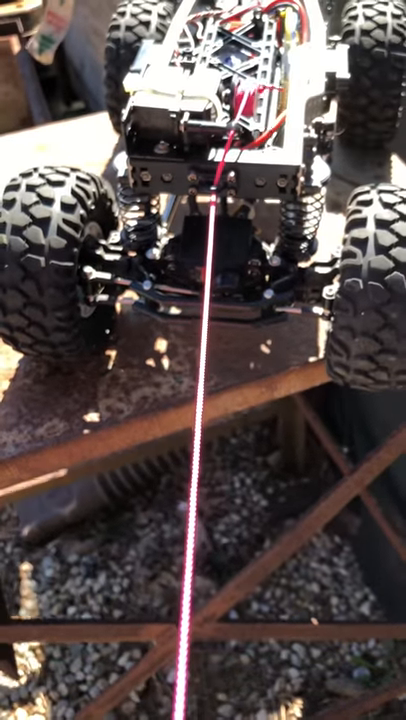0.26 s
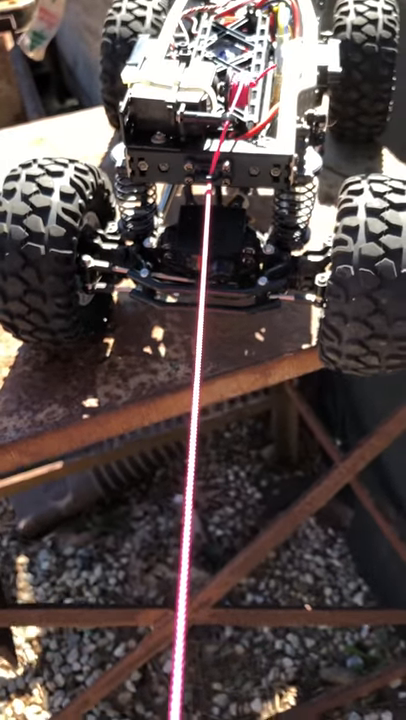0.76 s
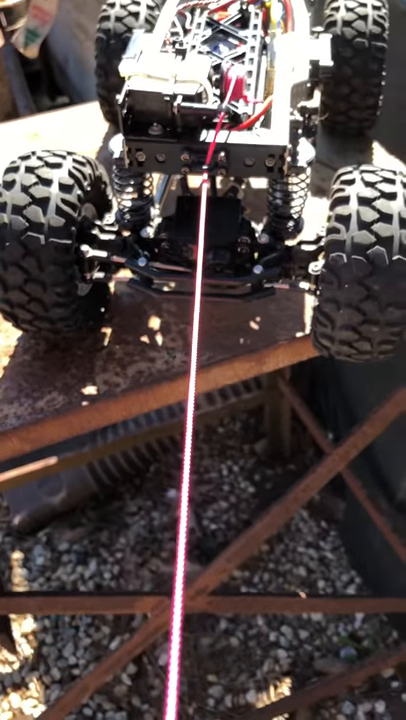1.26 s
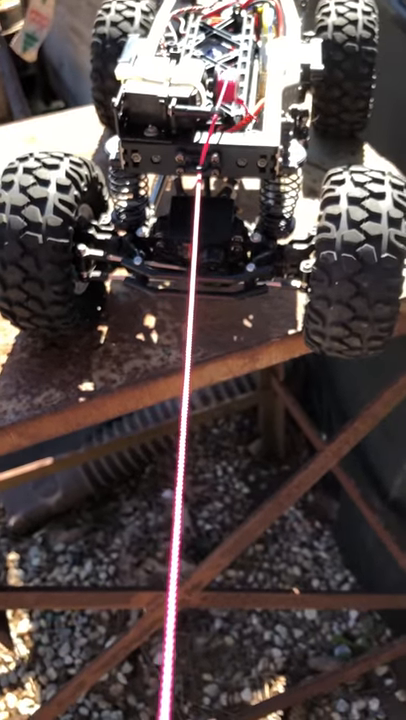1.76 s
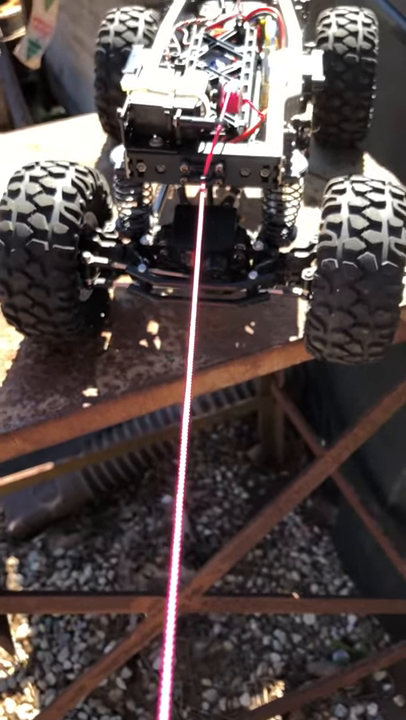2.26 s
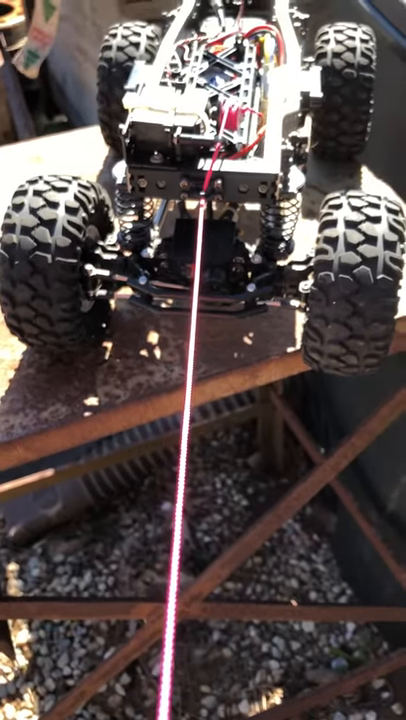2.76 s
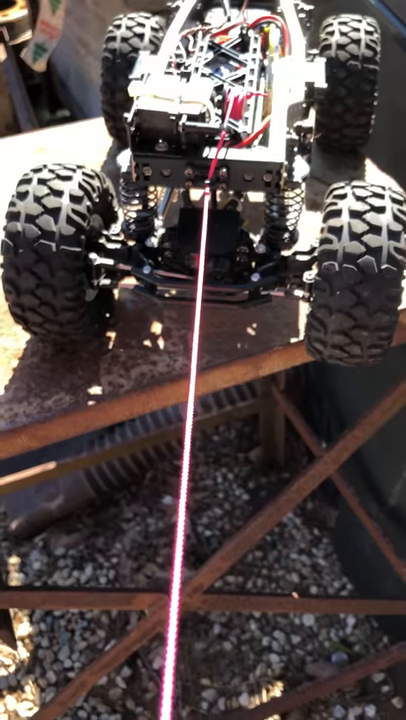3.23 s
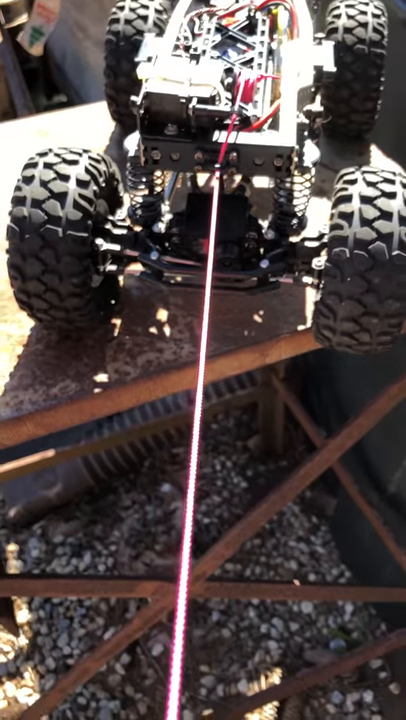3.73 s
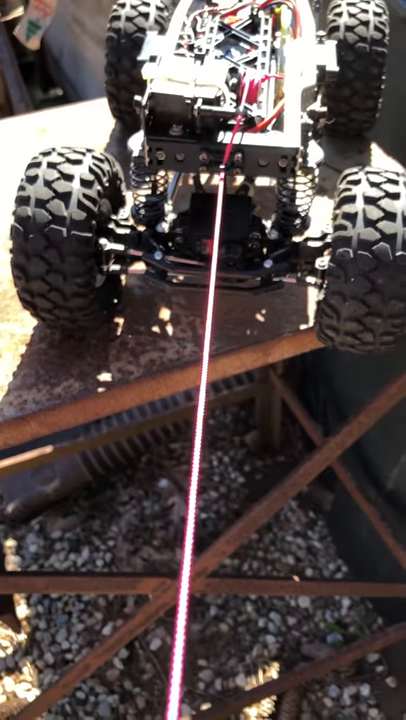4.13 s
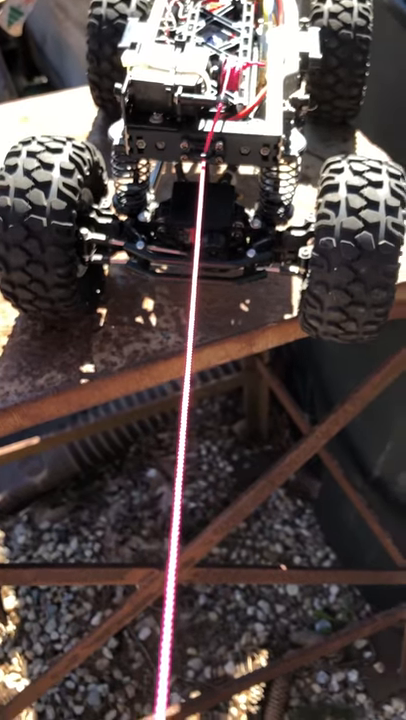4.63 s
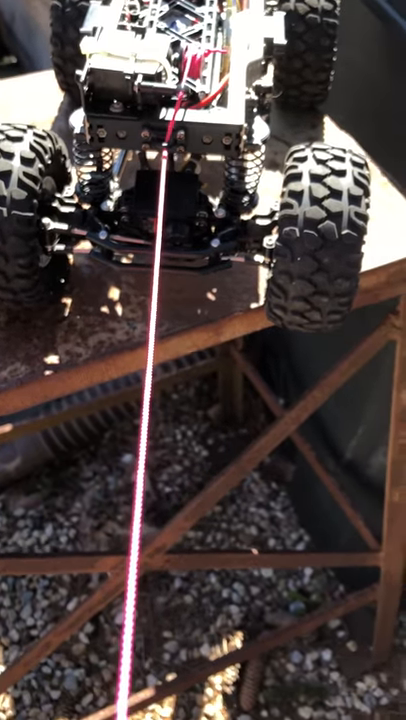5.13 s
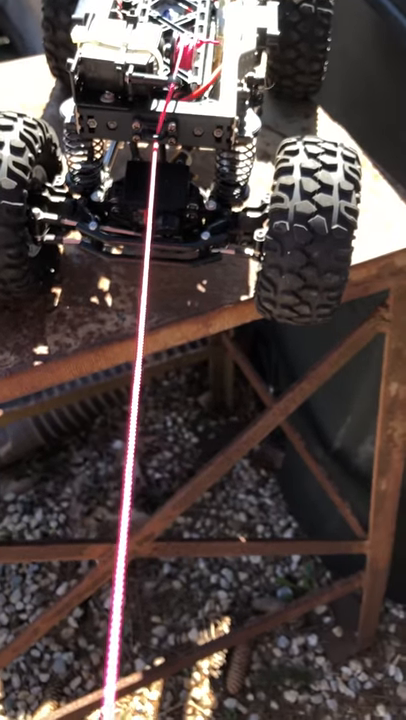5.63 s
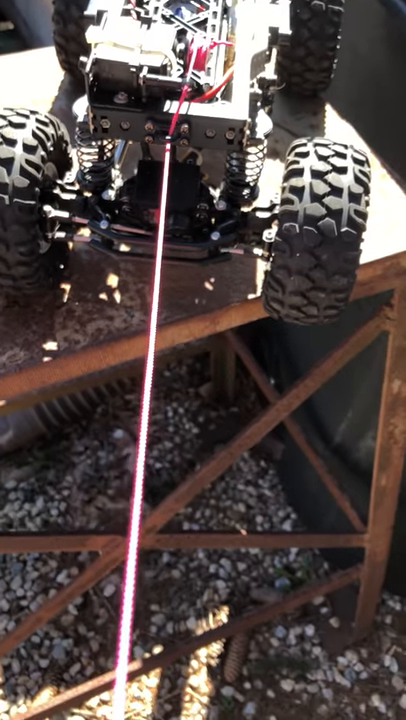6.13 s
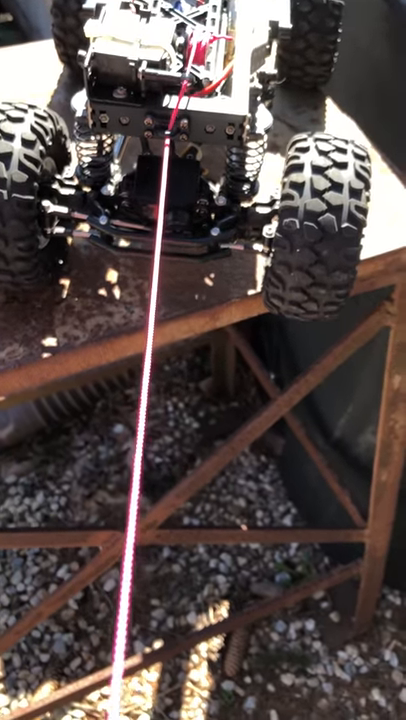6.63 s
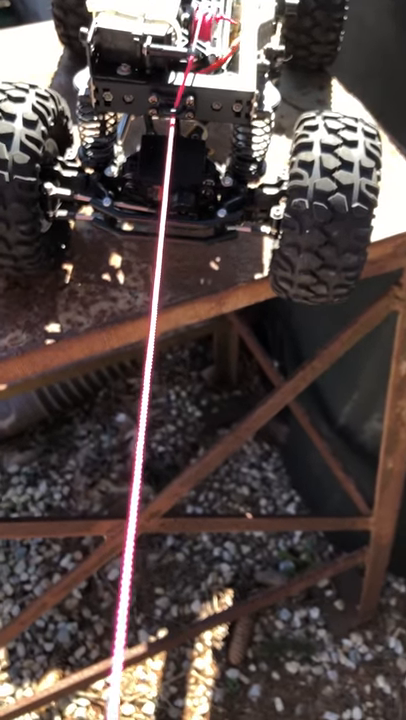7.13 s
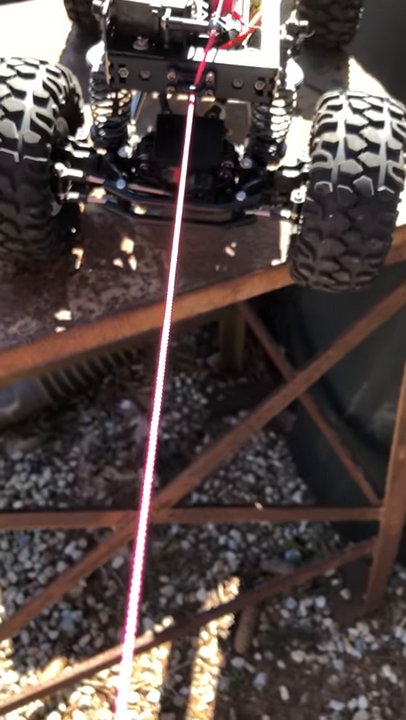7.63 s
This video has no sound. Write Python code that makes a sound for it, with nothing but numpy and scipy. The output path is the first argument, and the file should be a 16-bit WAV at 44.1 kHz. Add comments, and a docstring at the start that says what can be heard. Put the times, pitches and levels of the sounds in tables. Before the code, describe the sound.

A small winch rasps and pings, pulls a model truck knocking onto steel, pauses amid faint birdsong, then whines back to life.

```python
"""First you hear rasping gears, close by and outdoors: a small servo winch is dragging a model truck.
The taut line pings as it slips on the drum, and the truck rumbles and knocks up onto a steel plate.
The winch stops. In the pause the line ticks and creaks, and birds twitter over a distant hum.
At the end the motor spins up again with a whine and reels in the line."""
import sys
import numpy as np
from scipy import signal
from scipy.fft import rfft, irfft
from scipy.io import wavfile
from scipy.ndimage import uniform_filter1d, map_coordinates

SR = 44100
rng = np.random.default_rng(int(sys.argv[2]) if len(sys.argv) > 2 else 0)


def int16_out(signal):
    """Quantize to a 16-bit WAV file."""
    q = np.round(np.clip(np.atleast_2d(signal).T, -1, 1) * 32767)
    wavfile.write(sys.argv[1], SR, q.astype(np.int16))


N = 347508
T = np.arange(N) / SR
HZ = np.fft.rfftfreq(N, 1 / SR)


def amp(db):
    """Turns decibels into a number to multiply by."""
    return 10 ** (np.asarray(db) / 20)


def evened(x):
    """Scales a signal to an average strength (rms) of 1."""
    return x / np.sqrt(np.mean(x ** 2) + 1e-20)


def at_peak(x, db):
    """Scales a sound so that its peak is at db."""
    return amp(db) * x / abs(x).max()


def read(points, hz):
    """Looks up a table between its frequencies, with octaves evenly spaced."""
    f, value = np.transpose(points)
    return np.interp(np.log(hz + 1), np.log(f + 1), value)


def add(mix, s, sound):
    """Mixes a sound in, s seconds from the start."""
    part = mix[max(round(s * SR), 0):][:len(sound)]
    part += sound[:len(part)]


def wander(rate_hz):
    """A smooth random wobble; a higher rate makes it quicker."""
    return evened(irfft(rfft(rng.standard_normal(N)) * np.exp(-(HZ / rate_hz) ** 2), N))


def coloured(x, colour, modes=()):
    """Gives x a colour (its balance of lows and highs) and modes (narrow peaks and dips)."""
    hz = np.fft.rfftfreq(len(x), 1 / SR)
    peaks = sum(db / (1 + (2 * (hz - f) / width) ** 4) for f, width, db in modes)
    return evened(irfft(rfft(x) * amp(read(colour, hz) + peaks), len(x)))


def envelope(start, end, rise_s, fall_db_per_s):
    """Rises from start, holds until end, then dies away."""
    rise = 1 - np.exp(-np.maximum(T - start, 0) / rise_s)
    return rise * amp(-fall_db_per_s * np.maximum(T - end, 0))


# the winch struggles, eases off and stops; later it restarts and the line goes taut
LABOUR_S, EASE_S, STOP_S, RESTART_S, TAUT_S = 1.555, 2.055, 3.08, 7.112, 7.235
FREE_HZ = 1495  # the motor's pitch on a slack line
# motor speed while reeling in (time [s], pitch [Hz])
REEL_SPEED = [(7.24, 1479), (7.412, 1384), (7.562, 1395), (7.588, 1381), (7.76, 1388), (7.778, 1362),
              (7.85, 1363)]


def motor_speed(pull_hz=1400, sag_hz_per_s=130, spin_up_s=.008):
    """Speed as a pitch: the motor slows under load, races on the slack line, then settles."""
    pulling = pull_hz - sag_hz_per_s * np.minimum(T, EASE_S)
    racing = FREE_HZ * (1 - np.exp(-np.maximum(T - RESTART_S, 0) / spin_up_s))
    reeling = np.interp(T, *np.transpose(REEL_SPEED))
    speed = np.select([T < RESTART_S, T < TAUT_S], [pulling, racing], reeling)
    return speed * (1 + .0065 * wander(20))


# slightly lopsided gear wheels (speed [turns per tooth strike], ripple [dB])
WHEELS = [(1 / 61, 1.3), (2 / 61, 0.72), (5 / 56, 0.41)]


def gears(teeth, grit_db=2.5, hiss=.79, wear=.5, flicker_db=1.24):
    """Teeth strike unevenly and slide; lopsided wheels make the force ripple."""
    strikes = np.diff(np.floor(teeth), prepend=0) * amp(grit_db * np.clip(rng.standard_normal(N), -2, 2))
    # the small driving gear scrapes over the same worn spots on every turn
    surface = rng.standard_normal(330)
    scrape = map_coordinates(surface, [teeth / 11 % 1 * len(surface)], order=3, mode="grid-wrap")
    clatter = evened(strikes * rng.standard_normal(N))
    rasp = .44 * clatter + wear * scrape + hiss * rng.standard_normal(N)
    ripple = sum(db * np.sin(2 * np.pi * (ratio * teeth + rng.random())) for ratio, db in WHEELS)
    return rasp * amp(ripple + flicker_db * wander(140))


def labouring(throb_hz=11.4, throb_db=.9, sag_db=-15, catch_s=1.577, turn_s=.0631):
    """The load throbs; close to stalling, the gears go quieter and catch twice a turn."""
    def catch(first_s, width_s, db):
        offset = (T - first_s + turn_s / 2) % turn_s - turn_s / 2
        return db * np.exp(-(offset / width_s) ** 4)
    surges = sag_db + catch(catch_s, width_s=.0125, db=13.3) + catch(catch_s + .026, .008, db=10.5)
    throb = throb_db * np.sin(2 * np.pi * (throb_hz * T + rng.random()))
    return amp(uniform_filter1d(np.where(T < LABOUR_S, throb, surges), size=130))


# the gear case's colour when pulling, coasting, racing and reeling (frequency [Hz], level [dB])
PULL_CASE = [(240, -45), (400, -10.5), (763, -19), (1570, -11.5), (1780, -15.5), (1980, -12.5),
             (2210, -15.5), (3500, -12), (6180, -10), (9080, -1.5), (15800, -4.5)]
COAST_CASE = [(700, -22), (1200, -12), (2000, -14), (3400, -12), (5000, -11.5), (6300, -14.5), (7300, -7.7),
              (8700, -12.5), (10500, -14.5), (12000, -14), (13500, -9), (15800, -5)]
SPIN_CASE = [(350, -63), (600, -33), (757, -10), (880, -19.5), (2630, -10), (2930, -8), (4190, -13),
             (5070, -5), (13800, -2), (15800, -2)]
REEL_CASE = [(500, -40), (900, -19), (1400, -19), (2300, -22.5), (2700, -15.5), (3500, -7), (5000, -6.5),
             (7100, -4), (9200, 0.5), (12000, -4), (15800, -4)]
# its peaks and dips, plus extra ones when racing and reeling (frequency [Hz], width [Hz], boost [dB])
CASE_MODES = [(1987, 150, 6.5), (2430, 90, 1.5), (2645, 280, 5.5), (3020, 210, 5.5), (3465, 216, 8.5),
              (3750, 190, -3), (3980, 130, 2.5), (4280, 200, -1), (4950, 680, 5), (5590, 230, 3.5),
              (6270, 420, -1.5), (7130, 370, 7), (7680, 300, -1.5), (8100, 250, -8), (9040, 410, 5.5),
              (10090, 320, -6), (10600, 700, 2.5), (11440, 510, -7), (12000, 380, 1.5), (13000, 1000, 1.5),
              (14600, 970, -6)]
SPIN_MODES = [(1830, 100, 4), (2210, 90, 6), (3000, 53, 12.5), (3480, 110, 5), (4180, 180, -5),
              (5170, 80, -2), (6700, 120, 7), (10050, 200, -6), (10400, 300, 6), (13800, 830, 6)]
REEL_MODES = [(2300, 250, -2), (2750, 90, -2), (3080, 270, -1.5), (3530, 180, -0.5), (3850, 160, -2),
              (4060, 98, 2), (4300, 230, -8), (5400, 150, 1), (6170, 730, -5), (7250, 160, 1),
              (7750, 300, -1), (8120, 140, 11), (8550, 200, -5), (9700, 270, -10), (10460, 280, 2)]


def winch(pull_db=-39.7, coast_db=-59.5, spin_db=-31.7, reel_db=-42.7, rise_s=.003, cut_db_per_s=1800):
    """The gears rasp inside their case; after the restart the motor's whine joins in."""
    speed = motor_speed()
    teeth = np.cumsum(speed) / SR  # counts the tooth strikes so far
    drive = gears(teeth)
    pull = envelope(0, EASE_S, rise_s, cut_db_per_s) * labouring()
    # a softer whirr is left when the drive lets go
    unloading = amp(9.3 * np.exp(-(np.maximum(T - EASE_S, 0) / .4) ** 2))
    coast = envelope(LABOUR_S, STOP_S, rise_s, fall_db_per_s=95) * unloading
    spin = envelope(RESTART_S, TAUT_S, rise_s=.022, fall_db_per_s=cut_db_per_s)
    reel = envelope(TAUT_S, T[-1], rise_s, cut_db_per_s)
    rasp = amp(pull_db) * pull * coloured(drive, PULL_CASE, CASE_MODES)
    rasp += amp(coast_db) * coast * coloured(drive, COAST_CASE, CASE_MODES)
    rasp += amp(spin_db) * spin * coloured(drive, SPIN_CASE, CASE_MODES + SPIN_MODES)
    rasp += amp(reel_db) * reel * coloured(drive, REEL_CASE, CASE_MODES + REEL_MODES)
    return rasp + whine(speed, teeth, spin, reel)


# the hum's low note (time [s], level [dB])
HUM_LEVEL = [(0, -53), (.95, -58.5), (1.6, -53), (2.6, -61.5), (4.15, -63), (4.45, -50), (5.1, -53),
             (5.65, -63), (6.95, -52.5), (7.4, -58), (7.88, -57)]
# the note an octave above it (time [s], level added to octave_db [dB])
OCTAVE_LEVEL = [(0, -8), (4.2, -6.5), (4.7, 1), (5.5, -7), (6.3, 4), (6.8, -2), (7.88, -8)]


def hum(pitch_hz=148.6, droop_per_s=.0022, octave_db=-68):
    """A distant machine hums on two notes that waver and slowly sink."""
    phase = 2 * np.pi * pitch_hz * np.cumsum(1 - droop_per_s * T + .0035 * wander(4.8)) / SR
    low = amp(np.interp(T, *np.transpose(HUM_LEVEL))) * np.sin(phase)
    octave = amp(octave_db + np.interp(T, *np.transpose(OCTAVE_LEVEL))) * np.sin(2 * phase)
    return np.sqrt(2) * (low + octave)


# the colour of outdoor air (frequency [Hz], level [dB])
AIR_COLOUR = [(15, -55), (25, -29), (60, -4.5), (95, -8), (125, -7), (180, -10), (290, -16), (490, -17.5),
              (790, -23.5), (1930, -39), (7400, -47.5), (11700, -49), (15800, -47.5)]


def air(level_db=-56.5, swell_db=1):
    """A low wash of air that gently swells and fades."""
    return amp(level_db + swell_db * wander(1.33)) * coloured(rng.standard_normal(N), AIR_COLOUR)


# very high electronic tones (pitch [Hz], level [dB])
TONES = [(11763, -89.5), (14702, -93)]


def electronic_tones():
    """Electronics whistle faintly and steadily."""
    return np.sqrt(2) * sum(amp(db) * np.sin(2 * np.pi * hz * T) for hz, db in TONES)


# slips of the line (time [s], ping peak [dB], brightness [dB], snap peak [dB])
PINGS = [(.094, -29.5, -1.5, -57), (.297, -28, -8.5, -55), (.533, -27.5, -3, -48), (.684, -33, -22, -55),
         (1.184, -29, -9, -50), (1.632, -38, -6, -55), (1.78, -29, -2.5, -49), (2.5978, -26, 1, -30),
         (2.8966, -25, 1, -31.5), (3.2159, -36, 1.5, -43), (4.126, -27.5, -2.5, -28.5),
         (4.3112, -26, 6.5, -27.5), (6.878, -33.5, -10, -55), (7.0996, -19, 11, -39)]
# the colour of a ping (frequency [Hz], level [dB])
PING_COLOUR = [(500, -50), (720, -12), (850, 2.5), (1100, -7), (1320, 3), (1700, -8.5), (2050, 0),
               (2450, 2.5), (2850, -4.5), (3400, -12), (4000, -7), (5000, -4), (7000, -20.5), (9000, -37),
               (16000, -25)]


def pings(lag_s=.0035, scatter=.64, ring_s=.06):
    """Each slip snaps and sends a wave along the line; its highs arrive first, making a tiny 'pew'."""
    out, t, hz = np.zeros(N), T[:4096], np.fft.rfftfreq(4096, 1 / SR)
    delay = lag_s * (1000 / np.maximum(hz, 500)) ** 1.5
    glide = np.exp(-2j * np.pi * np.cumsum(delay) * hz[1])
    highs = np.exp(-(np.log2((hz + 1) / 4400) / .67) ** 2)  # harder slips ring more up here
    for s, db, bright_db, snap_db in PINGS:
        echoes = evened(rng.standard_normal(len(t)) * amp(-60 * t / ring_s)) / np.sqrt(len(t))
        spectrum = (1 + scatter * rfft(echoes)) * glide * amp(read(PING_COLOUR, hz) + bright_db * highs)
        ping = np.roll(irfft(spectrum), 64)  # leaves room for the start of the ping
        add(out, s - 48 / SR, at_peak(ping, db))
        add(out, s, snap(snap_db, length_s=.0028))
    return out


# the colour of a snap or tick (frequency [Hz], level [dB])
SNAP_COLOUR = [(600, -32), (2000, -3.5), (3500, -1.5), (5500, -6), (7300, -0.5), (8500, 0), (10500, -1.5),
               (13500, -9), (16000, -9.5)]


def snap(peak_db, length_s, ring_s=.09, ring_db=-17):
    """A dry crackle, then a brief ring of the frame."""
    t = T[:3000]
    shape = np.exp(-(t / length_s) ** 2) + amp(ring_db - 60 * t / ring_s)
    return at_peak(coloured(rng.standard_normal(len(t)), SNAP_COLOUR) * shape, peak_db)


# soft low bumps (time [s], peak [dB], length [s], pitch [times normal])
BUMPS = [(1.308, -41.5, 0.038, 1.02), (1.384, -36, 0.049, 1.02), (1.511, -38.5, 0.092, 0.93),
         (4.795, -33, .016, 1.25), (4.803, -36, .008, 3.1), (5.581, -44.5, 0.034, 1.08),
         (5.809, -45.5, .04, 1.02)]
# their colour at normal pitch (frequency [Hz], level [dB])
BUMP_COLOUR = [(25, -30), (45, 2), (70, 22), (110, 2), (200, -9), (320, -17), (520, -41), (2000, -70)]


def bumps():
    """Dull pushes with no ring, each a short swell of deep noise."""
    out, t = np.zeros(N), T[:SR // 4]
    for s, db, length, pitch in BUMPS:
        push = rng.standard_normal(len(t)) * np.exp(-(2 * (t - t.mean()) / length) ** 2)
        bump = coloured(push, np.multiply(BUMP_COLOUR, [pitch, 1]))
        add(out, s - t.mean(), at_peak(bump, db))
    return out


# lurches of the truck (start [s], end [s], level [dB], fade [dB per s])
LURCHES = [(1.829, 2.06, -33, 55), (2.222, 2.36, -33, 125)]
# the steel plate's colour (frequency [Hz], level [dB])
PLATE_COLOUR = [(21, -38), (35, -20), (65, 9), (298, -7.5), (434, -10.5), (672, -11), (979, -13),
                (1170, -25), (1270, -12.5), (1460, -24.5), (4000, -30.5), (5200, -42), (8800, -120)]
# its peaks and dips (frequency [Hz], width [Hz], boost [dB])
PLATE_MODES = [(62.3, 9.4, 7), (100, 15, -6), (122, 7.6, 2), (286, 33, 0), (389, 31, 8), (443, 13, 9),
               (538, 9.1, 8), (664, 98, -3), (766, 45, 4.5), (983, 83, 4), (1242, 33, 6.5), (1590, 20, 2.5),
               (1705, 20, 2)]


def plate_rumble(rise_s=.008, lumps_db=2, linger_db=-26):
    """The tyres lurch over the edge and shake the plate; the frame rings on faintly."""
    rumble = coloured(rng.standard_normal(N) * amp(lumps_db * wander(66)), PLATE_COLOUR, PLATE_MODES)
    shake = np.zeros(N)
    for start, end, db, fade in LURCHES:
        shake += amp(db) * envelope(start, end, rise_s, fade)
        shake += amp(db + linger_db) * envelope(start, end, rise_s, fall_db_per_s=9)
    return shake * rumble


# blows on the plate (time [s], peak before gain_db [dB], treble before bright_db [dB])
KNOCKS = [(1.834, -26, -20), (1.882, -24, -20), (1.908, -17, -15), (1.941, -20.5, -24), (1.984, -24.5, -15),
          (2.003, -26.5, -12), (2.03, -24.5, -14), (2.046, -19, -15), (2.225, -21.5, -16),
          (2.265, -17, -11.5), (2.307, -21, -10.5), (2.342, -25.5, -17), (2.474, -38, -27)]
# the colour of a blow (frequency [Hz], level [dB])
KNOCK_COLOUR = [(40, -25), (100, 0), (400, -3.5), (900, -7.5), (1500, -9.5), (2500, -15), (6000, -13),
                (10000, -22), (16000, -22)]
# how long it rings (frequency [Hz], time to fade by 60 dB [s])
KNOCK_RING = [(70, 0.33), (500, .17), (1500, 0.11), (4000, 0.06), (12000, 0.037)]


def knocks(gain_db=1, bright_db=8):
    """The truck knocks on the steel plate; the highs die away first."""
    out = np.zeros(N)
    for s, db, treble_db in KNOCKS:
        noise = coloured(rng.standard_normal(SR // 3), KNOCK_COLOUR, PLATE_MODES)
        hz, t, bands = signal.stft(noise, SR, nperseg=256)
        tilt_db = (treble_db + bright_db) / (1 + (3500 / (hz + 1)) ** 4)
        fade_db = 60 * t / read(KNOCK_RING, hz)[:, None]
        blow = signal.istft(bands * amp(tilt_db[:, None] - fade_db), SR, nperseg=256)[1]
        add(out, s, at_peak(blow, db + gain_db))
    return out


# small dry ticks (time [s], peak [dB])
TICKS = [(2.1258, -34), (2.3281, -32), (2.4284, -33.5), (2.5331, -38), (2.6594, -36.5), (2.802, -38.5),
         (2.9396, -37), (3.0759, -36.5), (3.209, -40.5), (3.24, -41), (3.464, -41), (3.5285, -48),
         (3.689, -43.5), (3.719, -43.5), (3.865, -41), (3.9443, -47), (3.9758, -43), (4.0896, -41),
         (4.1533, -44), (4.2492, -43), (4.2802, -43)]


def ticks(faint_count=6, faint_db=-54, faint_span_s=(3.5, 4.3)):
    """The taut line and the gears tick as they settle, with a few fainter ticks at random."""
    out = np.zeros(N)
    slots = (np.arange(faint_count) + rng.random(faint_count)) / faint_count
    times = np.interp(slots, [0, 1], faint_span_s)
    levels = faint_db + 2 * rng.standard_normal(faint_count)
    for s, db in TICKS + list(zip(times, levels)):
        add(out, s, snap(db, length_s=.0016))
    return out


def sing(mix, start, db, glide, roughness):
    """Adds one bird note: a trembling, sliding whistle, never twice quite the same."""
    s, hz = np.transpose(glide)
    t = np.arange(s.min(), s.max(), 1 / SR)
    tremble = evened(uniform_filter1d(rng.standard_normal(len(t)), size=24))
    pitch = uniform_filter1d(np.interp(t, s, hz), size=200)
    pitch *= 1 + .0165 * rng.standard_normal() + roughness * tremble
    whistle = np.sin(2 * np.pi * np.cumsum(pitch) / SR) * signal.windows.tukey(len(t), .7)
    add(mix, start + s[0], amp(db + 1.5 * rng.standard_normal()) * whistle)


# each time the phrase is sung (time [s], base level [dB])
PHRASES = [(2.548, -55), (3.129, -55.5), (4.022, -56.5), (4.944, -54), (5.718, -52.5), (6.988, -55)]
# its notes (added level [dB], list of (time in the phrase [s], pitch [Hz]))
PHRASE_NOTES = [(-6, [(-.04, 4000), (-.03, 4600), (-.012, 3900)]), (-15, [(-.02, 8700), (-.012, 7400),
                (0, 6000)]), (-1, [(-.003, 4600), (.009, 5430), (.022, 5330), (.032, 4900)]),
                (-5, [(.03, 5000), (.042, 4150), (.055, 3550), (.08, 3100)]), (1, [(.016, 4100),
                (.028, 4550), (.04, 4650), (.048, 3900)]), (-3, [(.052, 5100), (.066, 3600)]),
                (-7.5, [(.09, 3000), (.118, 4000), (.135, 3000)])]


def bird_phrases(gain_db=-.2):
    """A bird repeats one short phrase."""
    out = np.zeros(N)
    for s, db in PHRASES:
        for note_db, glide in PHRASE_NOTES:
            sing(out, s, db + note_db + gain_db, glide, roughness=.026)
    return out


TRILL_START_S, TRILL_END_S = 3.847, 5.75
# one round of the trill (added level [dB], list of (time in the round [s], pitch [Hz]))
TRILL_NOTES = [(-5.5, [(0, 8200), (.008, 6680), (.019, 5940)]), (-5.5, [(.031, 7840), (.038, 6620),
               (.047, 6050)]), (-11.5, [(.058, 4500), (.078, 6040)])]


def bird_trill(level_db=-56, round_s=.0991):
    """Three high notes go round and round in a swelling trill."""
    out = np.zeros(N)
    for s in np.arange(TRILL_START_S, TRILL_END_S, round_s):
        for note_db, glide in TRILL_NOTES:
            sing(out, s, level_db + note_db, glide, roughness=.0081)
    return out * envelope(TRILL_START_S, T[-1], rise_s=.25, fall_db_per_s=0)


# the colour of the trill's blurred echo (frequency [Hz], level [dB])
TWITTER_COLOUR = [(1500, -51), (2900, -11.5), (3700, -3.5), (5000, 8), (5900, 1), (6600, 5.5), (7400, -13),
                  (8600, -14), (12000, -40)]


def twitter(level_db=-68):
    """The trill's diffuse echo blurs into a flickering hiss behind it."""
    swell = envelope(TRILL_START_S, TRILL_END_S, rise_s=.12, fall_db_per_s=110)
    return swell * amp(level_db + 2 * wander(40)) * coloured(rng.standard_normal(N), TWITTER_COLOUR)


# the colour of the creak (frequency [Hz], level [dB])
CREAK_COLOUR = [(600, -40), (1400, -14), (2000, -9), (2500, 0), (3600, -2), (4500, -11), (8000, -22),
                (16000, -32)]


def creak(start_s=4.391, peak_db=-38.5, rise_s=.001, fade_s=.075):
    """The line rubs once, briefly, against the drum."""
    out, t = np.zeros(N), T[:4096]
    shape = (1 - np.exp(-t / rise_s)) * amp(-60 * t / fade_s)
    rub = coloured(rng.standard_normal(len(t)), CREAK_COLOUR) * shape
    add(out, start_s, at_peak(rub, peak_db))
    return out


# bursts of chatter (start [s], notes [count], spacing [s], level [dB])
CHATTERS = [(5.12, 9, .063, -57.5), (6.495, 3, .128, -73)]
# one falling note (time [s], pitch [Hz])
CHIP_GLIDE = [(0, 5250), (.01, 4690), (.024, 3810)]


def bird_chatter():
    """A farther bird chatters in harsh, evenly spaced notes."""
    out = np.zeros(N)
    for start, count, spacing, db in CHATTERS:
        for s in start + spacing * np.arange(count):
            sing(out, s, db, CHIP_GLIDE, roughness=.14)
    return out


# the tones in the whine (pitch [times the motor's], relative level [dB], flutter [radians])
WHINE_TONES = [(1, 0, .25), (2, -5, .45), (3, -5, .6), (5, 2.5, .6), (6, 0, .55)]


def whine(speed, teeth, spin, reel, spin_db=-60, reel_db=-54.5, db_per_hz=.04, case_hz=7290):
    """The motor's tones grow with speed; one sings out as it passes a pitch where the case rings."""
    tones = np.zeros(N)
    for multiple, db, flutter in WHINE_TONES:
        ring_db = 6 / (1 + ((multiple * speed - case_hz) / 170) ** 4)
        phase = 2 * np.pi * multiple * teeth + flutter * wander(110)
        tones += amp(db + ring_db + 2 * wander(15)) * np.sin(phase)
    running = amp(spin_db) * spin + amp(reel_db) * reel
    return np.sqrt(2) * running * amp(db_per_hz * (speed - FREE_HZ)) * tones


def yard_echo(sound, near_s=.12, far_s=.6):
    """Near walls answer quickly; far ones leave a faint tail."""
    t = T[:SR // 2]
    echoes = rng.standard_normal(len(t)) * (amp(-60 * t / near_s) + amp(-11 - 60 * t / far_s))
    return signal.fftconvolve(sound, echoes / np.linalg.norm(echoes))[:N]


def scene():
    """Winch, truck, birds and background, all at one microphone."""
    close = winch() + pings() + ticks() + creak() + knocks() + plate_rumble() + bumps()
    song = bird_trill() + bird_phrases() + bird_chatter()
    birds = song + .8 * yard_echo(song) + twitter()
    return (close + birds + hum() + air() + electronic_tones())[None]


def record(dry):
    """Cuts away the very highest treble, above 15770 Hz."""
    low_pass = signal.firwin(511, 15770, window=("kaiser", 9), fs=SR)
    return signal.oaconvolve(dry, low_pass[None], "same")


dry = scene()
out = record(dry)
int16_out(out)
```